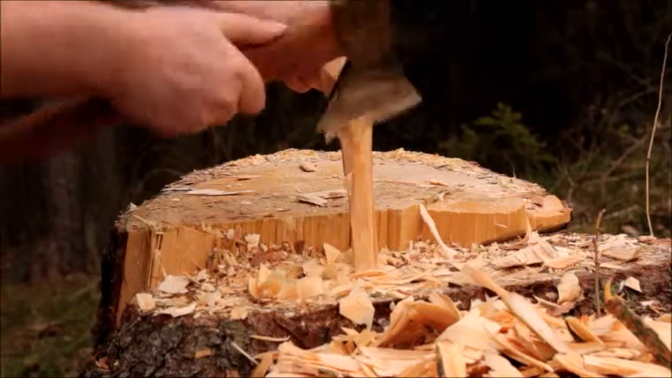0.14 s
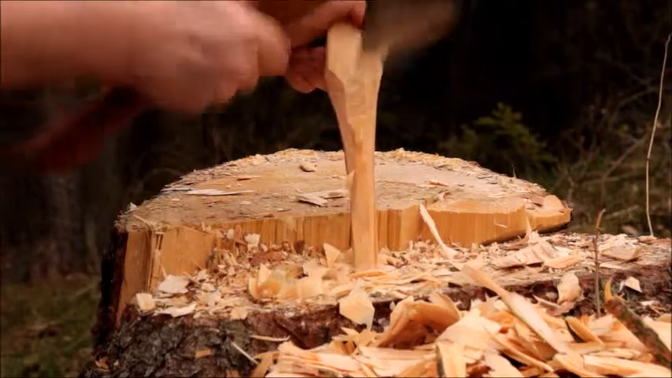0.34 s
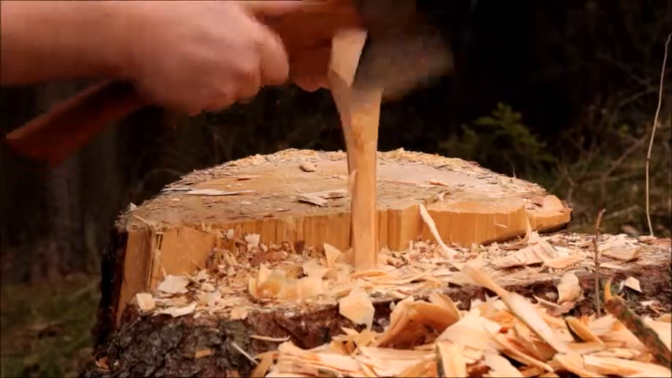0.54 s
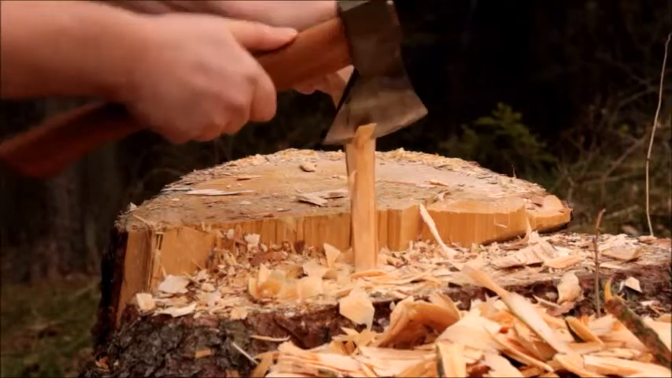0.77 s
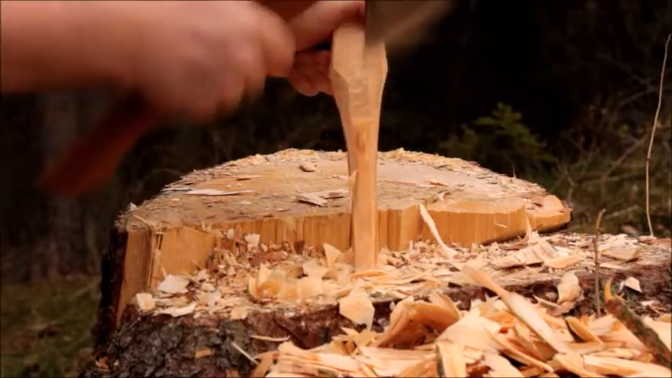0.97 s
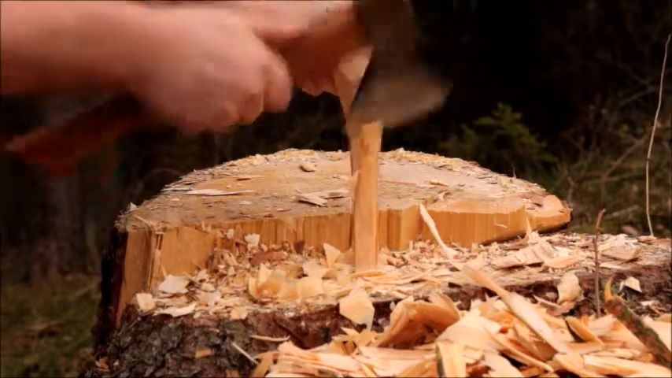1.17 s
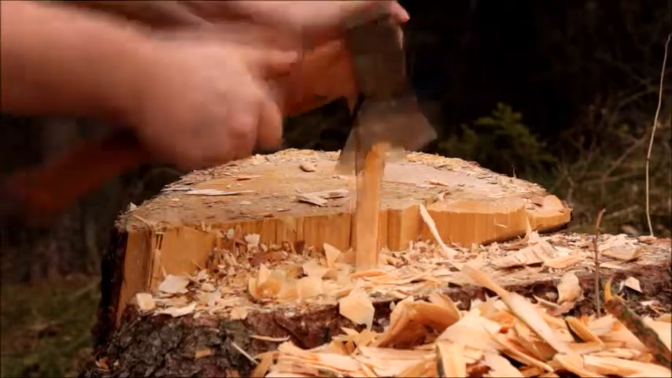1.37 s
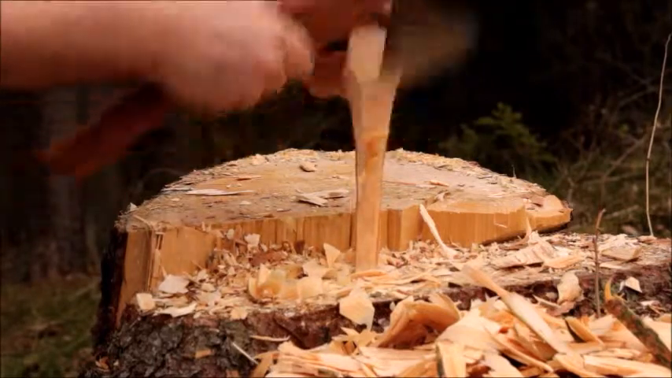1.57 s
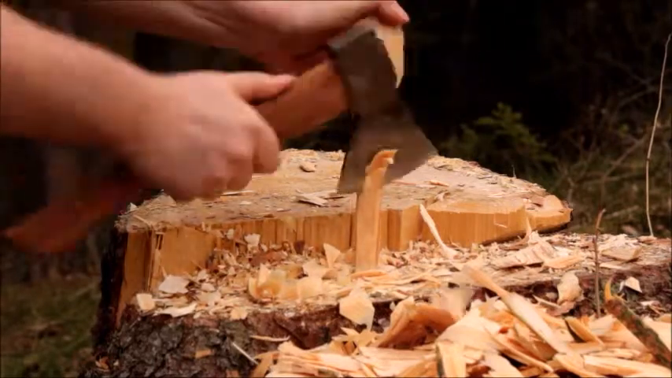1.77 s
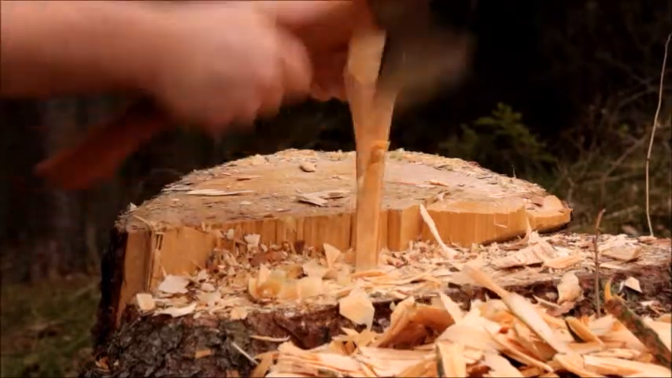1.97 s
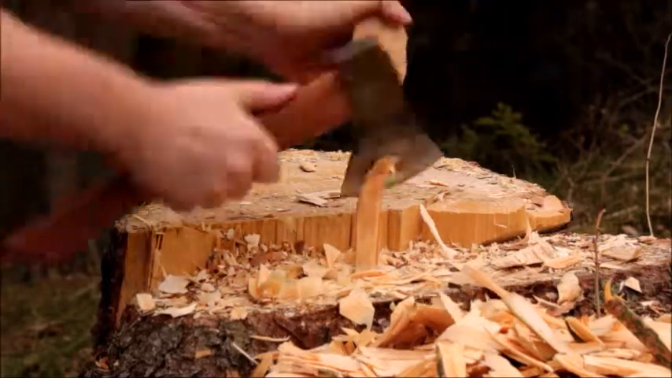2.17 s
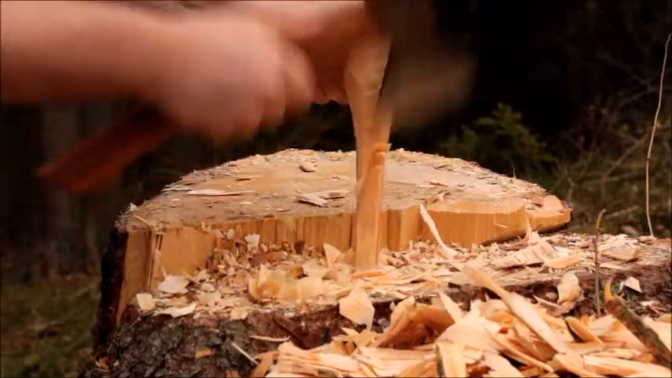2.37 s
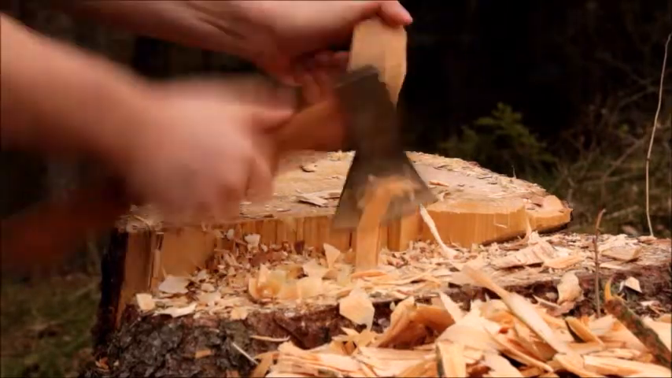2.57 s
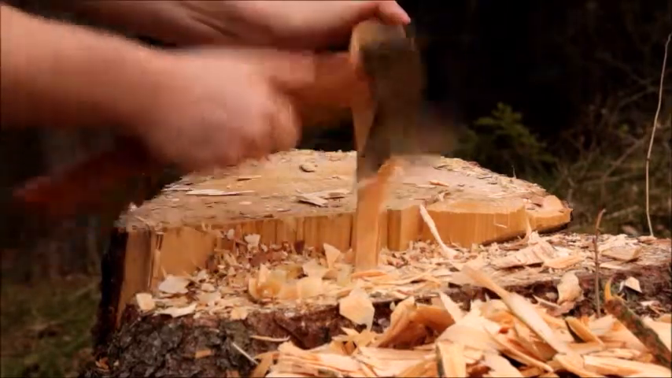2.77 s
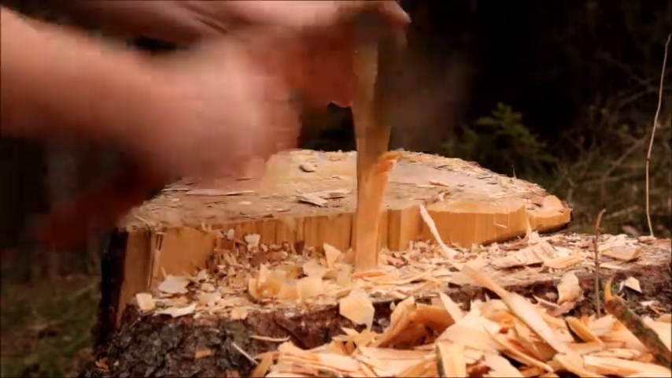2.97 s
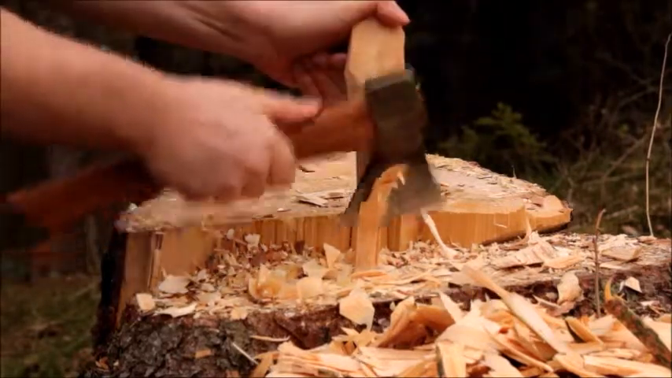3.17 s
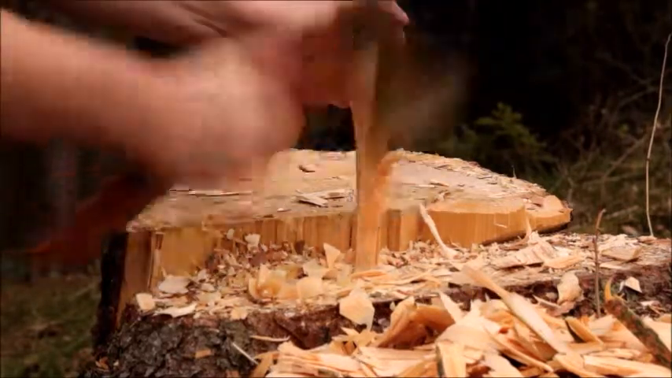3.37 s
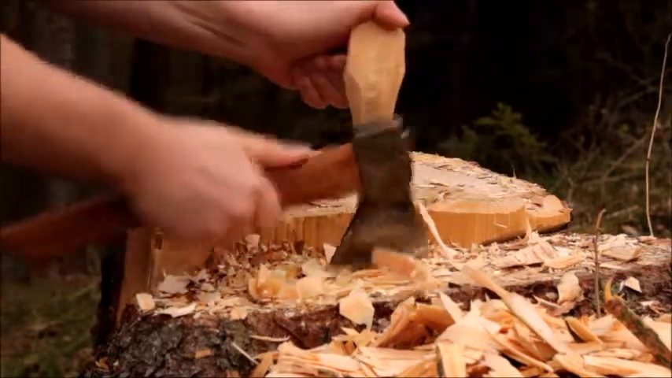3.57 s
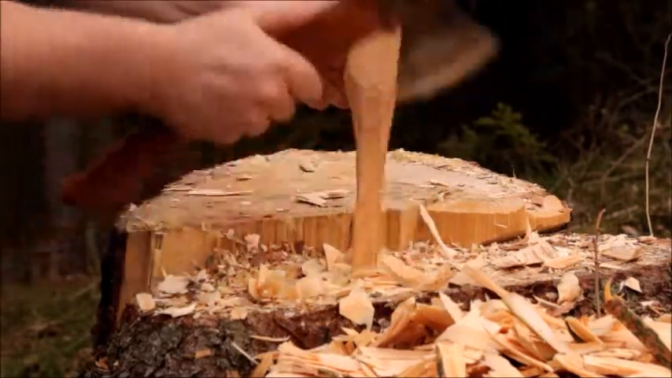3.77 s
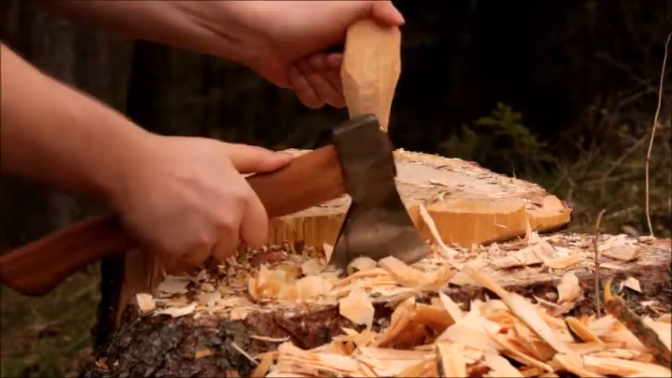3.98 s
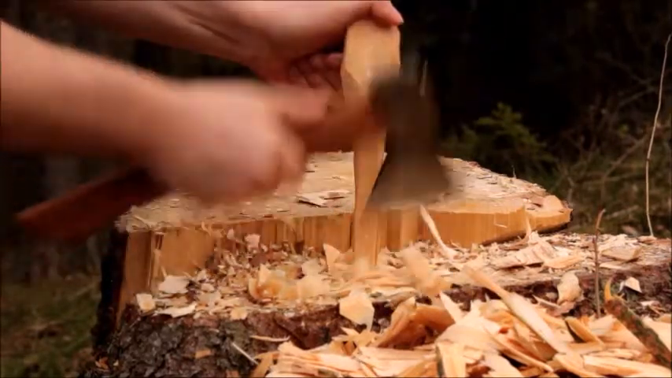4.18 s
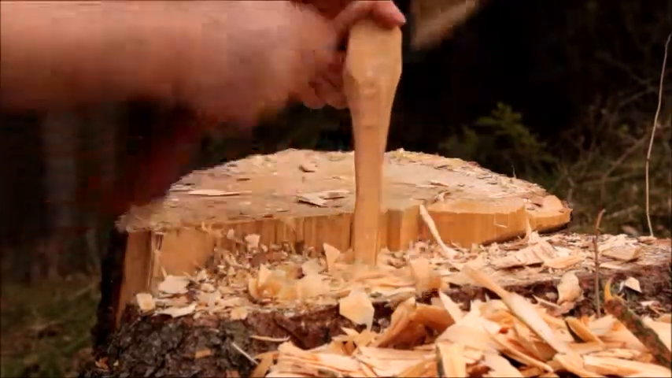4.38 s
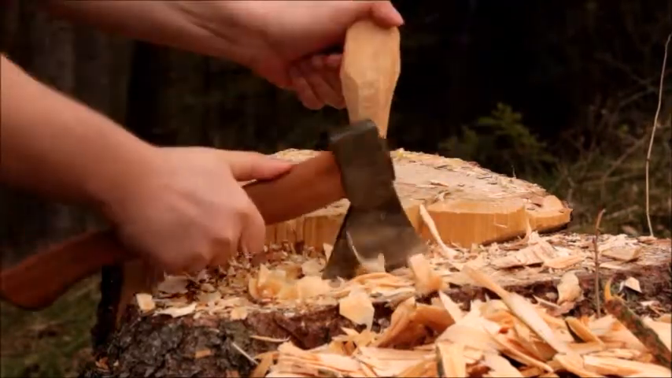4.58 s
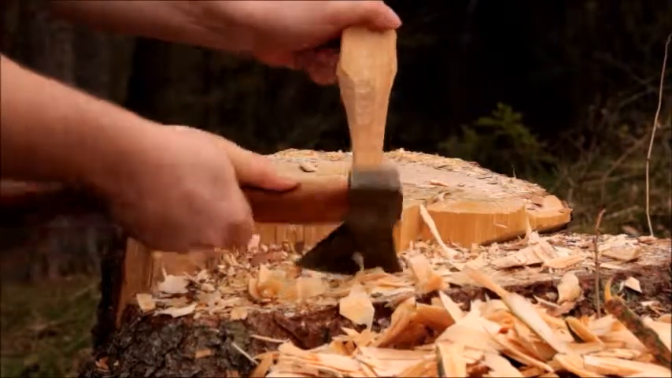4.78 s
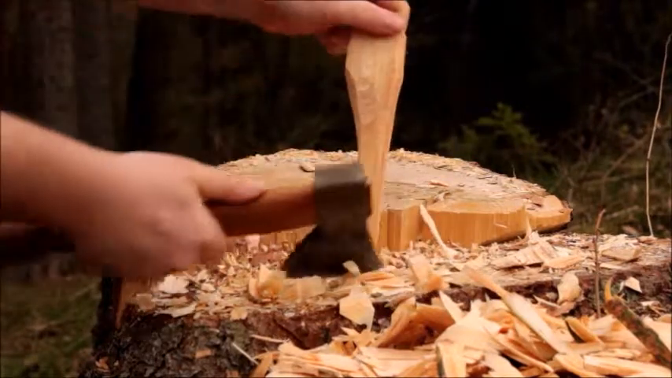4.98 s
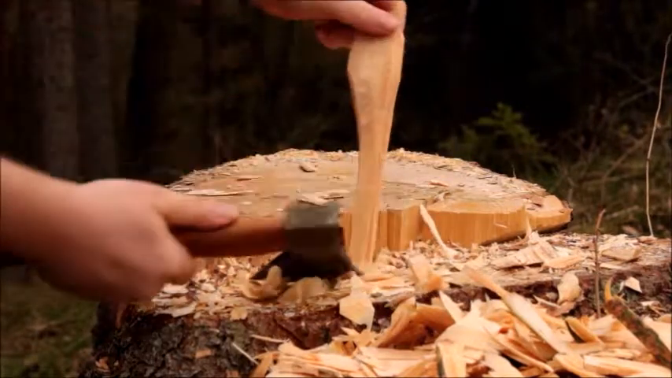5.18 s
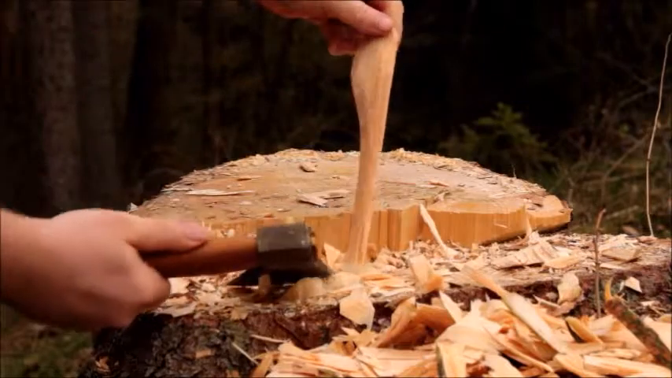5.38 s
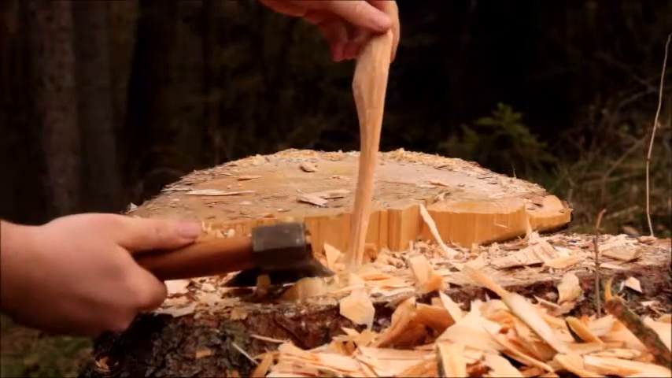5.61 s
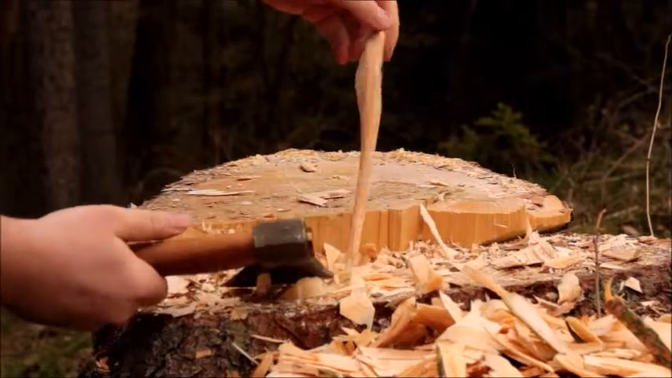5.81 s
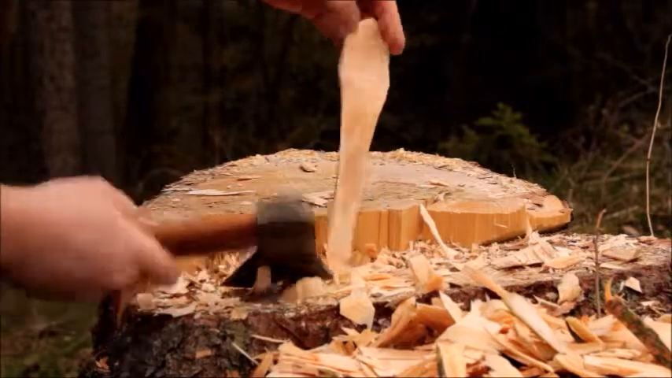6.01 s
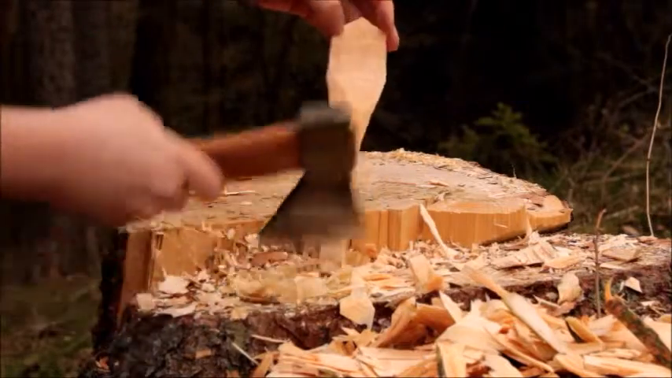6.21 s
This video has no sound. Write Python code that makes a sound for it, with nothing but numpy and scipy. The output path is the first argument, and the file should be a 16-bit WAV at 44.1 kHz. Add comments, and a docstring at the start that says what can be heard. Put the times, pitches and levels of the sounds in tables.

```python
"""A hatchet trims a wooden blank held upright on a stump in a forest, close to the microphone. Each chop sets
damped modes of blank, axe head and stump ringing; noise bursts crack, slice and snap the fibres. Among the
trees a small bird sings a two-note song of gliding tones, with fainter slurs; a second bird adds quick falls.
Far off are wavering bird whistles, a faint very high whistle, a blur of birds and a soft rush of air, all
coloured noise or slightly unsteady tones; trunks return a long wash of the axe and the song."""
import sys
import numpy as np
from scipy import signal
from scipy.fft import rfft, irfft, next_fast_len
from scipy.io import wavfile
from scipy.ndimage import uniform_filter1d, minimum_filter1d, map_coordinates

SR = 44100
rng = np.random.default_rng(int(sys.argv[2]) if len(sys.argv) > 2 else 0)


def digitize_waveform(pressure):
    """Quantize a signal to 16-bit integers and store it at the path in sys.argv[1].

    Rows of a 2-D input are taken as channels; values are limited to [-1, 1].
    """
    field = np.atleast_2d(pressure).T
    bounded = np.clip(field, -1, 1)
    quanta = np.round(bounded * 32767).astype(np.int16)
    wavfile.write(sys.argv[1], SR, quanta)


N = 275625
NOW = np.arange(N) / SR  # the whole scene, s
T = np.arange(SR // 4) / SR  # one short sound, s
BLOW_S = 0.008  # reference length for the energy of a blow
TOP_HZ = 16500  # upper band limit

# Distant air and birds.
# colour of air in the trees: f/Hz, relative level/dB per Hz
RUSH = [(12, -43), (20, 1.5), (86, 0), (168, -6), (204, -8), (347, -2.5), (499, -1), (949, -7), (1030, -7),
        (1120, -8), (1710, -13), (3530, -16), (5080, -20), (14300, -24), (16000, -23)]
# swells of the far birds: t/s, half width/s, level over their usual/dB
SWELLS = [(0, 0.22, 9.5), (2.03, 0.52, 9), (5.13, 0.36, 8)]
AIR_DB, CHORUS_DB = -53.5, -65.5  # air; far birds between their swells, relative to unit noise
DIP_S, DIP_DB, DIP_RECOVER_S = 2.65, -1.5, 0.14  # the background dips briefly and recovers
# single whistles from birds deep in the wood: t/s, length/s, f/Hz, level before each swells and fades/dB
FAR_NOTES = [(0.528, 0.84, 7220, -63.5), (1.279, 0.31, 3630, -58), (1.44, 0.22, 3090, -56),
             (4.06, 0.035, 4400, -59), (4.189, 0.028, 5580, -56.5), (4.699, 0.43, 2824, -65)]
# lower tone of a faint, very high whistle: t/s, f/Hz
WHISTLE = [(4.92, 12063), (5.04, 12500), (5.08, 13139), (5.164, 12100), (5.348, 12581), (5.356, 11833),
           (5.5, 10900)]
WHISTLE_DB, WHISTLE_SAG_DB_PER_S = -60, 10  # starting level of each tone and its decline
WHISTLE_FADE_S, WHISTLE_RATIO = 0.017, 1.21  # fade in and out; upper tone over lower

# The small bird among the trees.
# note shapes, before each note's pitch ratio: length/s, start f/Hz, wait/s, swoop time/s, settled f/Hz,
# drift/(Hz/s), closing flick/Hz, attack/s, sag/(dB/s), release/s
RISE = dict(length_s=.195, start_hz=6560, wait_s=0, swoop_s=.011, settled_hz=4597, drift_hz_per_s=3500, flick_hz=706, attack_s=0.044, sag_db_per_s=33, release_s=.02)
FALL = dict(length_s=0.1806, start_hz=7720, wait_s=0.043, swoop_s=.045, settled_hz=4536, drift_hz_per_s=-10000, flick_hz=-150, attack_s=0.071, sag_db_per_s=79, release_s=0.013)
SLUR = dict(length_s=0.16, start_hz=5150, wait_s=0, swoop_s=0.016, settled_hz=4100, drift_hz_per_s=-1500, flick_hz=-250, attack_s=0.01, sag_db_per_s=47.5, release_s=0.057)
QUICK_FALL = dict(FALL, length_s=0.11, wait_s=0, swoop_s=0.022, drift_hz_per_s=-12000, attack_s=0.028)
# when each note is sung: t/s, level before flutter/dB, pitch ratio
RISES = [(0.097, -45, 1.012), (.613, -44.5, 0.99), (1.117, -44, 0.99), (1.601, -60, 0.9),
         (4.314, -46, 1.02), (4.818, -41.5, 1.008), (5.332, -43, .99)]
FALLS = [(.348, -42, 0.98), (0.851, -38, 0.99), (1.369, -41.5, 0.96), (4.55, -39, 0.99), (5.07, -40, 0.98),
         (5.571, -41, 0.99)]
SLURS = [(1.855, -60, 0.78), (2.582, -60, 0.93), (2.965, -57.5, 1)]
QUICK_FALLS = [(4.081, -51, 1), (6.024, -58, 1)]
NOTE_RANGE_DB, FLICK_S = 19.5, 0.013  # how far below full level a note opens and closes; time of the flick
LEAD_IN_HZ_PER_S = 22000  # a waiting note climbs toward its start pitch

# The hatchet, close by.
# strokes: t/s, bending level/dB, blank's bending f/Hz, knock level/dB, crack level/dB,
# blade's travel through the wood/s, slicing level before fibre colour/dB, landing level/dB
STROKES = [(0.1035, -23.5, 1768, -24, -34.5, 0.023, -33, -24),
           (0.4361, -25.5, 1723, -24.5, -41.5, 0.013, -37, -28.5),
           (0.7428, -11, 1767, -23, -23.5, 0.017, -30, -27.5),
           (1.084, -16.5, 1737, -23, -30, 0.01, -36, -25.5),
           (1.4244, -27.5, 1970, -25, -40.5, .016, -42, -27),
           (1.796, -19.5, 1870, -22.5, -32, 0.013, -29.5, -34),
           (2.2178, -17.5, 2045, -21, -17, 0.013, -37, -56),
           (2.6287, -20.5, 2037, -21, -27.5, 0.0086, -31, -29.5),
           (3.0644, -17, 2126, -30.5, -20, 0.014, -29.5, -56),
           (3.4732, -21.5, 2176, -26, -31, .0232, -25.5, -21.5),
           (3.9672, -21.5, 2165, -25.5, -25, .0218, -27.5, -11),
           (4.5185, -14, 2123, -22.5, -19.5, 0.012, -19.5, -15)]
# modes of the blank, before they follow its bending pitch: f/Hz, relative level/dB, t60/s
BLANK = [(234, -31, 0.011), (410, -27, 0.0065), (499, -8.5, 0.06), (616, 10.5, 0.018), (900, 10, 0.012),
         (1042, 20.5, 0.0073), (1176, 6, 0.0056), (1480, -7, 0.02)]
# modes of the axe head: f/Hz, relative level/dB, t60/s
HEAD = [(2350, -3, 0.013), (2850, 2, 0.0062), (2840, 5, 0.028), (3220, -11, 0.014), (3510, -10.5, 0.037)]
# modes of the bare steel: f/Hz, relative level/dB, t60/s
STEEL = [(4530, -1, 0.023), (5510, 3, 0.041), (6700, -18, 0.0435), (10060, -16, 0.092), (14900, -18, .04)]
# the bare steel rings on: t/s, level/dB
PINGS = [(0.106, -43.5), (0.742, -22.5), (1.797, -54)]
# colour of the crack: f/Hz, relative level/dB
CRACK = [(1500, -25), (3000, -2.5), (3700, -4.5), (5200, -5.5), (7000, -10), (10000, -20.5), (14000, -25.5),
         (16000, -22.5)]
# wash from stump and ground: f/Hz, t60/s
SCATTER = [(150, 0.14), (600, 0.049), (1800, 0.067), (5000, 0.025), (15000, 0.015)]
# wash from the trunks: f/Hz, t60/s
FOREST = [(200, 0.385), (1000, 1.27), (2000, 0.46), (4500, 0.84), (8000, 0.74), (15000, 0.26)]
# modes of the stump: f/Hz, relative level/dB, t60/s
STUMP = [(282, -13, 0.02), (633, -5.5, 0.0086), (828, -5, 0.012), (979, 6, 0.012), (1175, 4.5, .012),
         (1410, -8, 0.008), (2000, -4, 0.0093), (3230, 1, 0.014), (4020, 1.5, 0.009)]
# dull bumps as hatchet and blank are shifted: t/s, level/dB, f/Hz
BUMPS = [(3.693, -46, 74), (4.59, -44.5, 79), (4.68, -50, 44.75), (4.79, -45, 50), (4.867, -46.5, 69),
         (5.98, -54, 59.3)]
# fibres snap as a chip breaks away: t/s, level before fibre colour/dB, centre f/Hz
SNAPS = [(0.1261, -32, 4570), (0.4478, -38, 4200), (0.452, -37, 6100), (1.0953, -32.5, 4830),
         (1.4416, -23, 6400), (1.4457, -31.5, 6500), (2.638, -17.5, 7700), (2.6473, -21.5, 13300),
         (3.4795, -22.5, 5450), (3.482, -26, 5300)]
# colour of breaking fibres: f/Hz, gain/dB
FIBRE = [(3000, -0.5), (4800, -4.5), (6500, 0), (8000, -3), (10200, -6), (13500, 2.5), (16000, 1.5)]
# a brief cluster of fading tones just after one stroke: f/Hz, relative level/dB, t60/s
CLUSTER = [(1260, -5, 0.12), (1590, -5, 0.098), (3350, 0.5, 0.083), (5630, -1.5, 0.081), (5930, -1, 0.091),
           (6400, -9, .1), (7070, -7, 0.085), (7540, -3, 0.095), (8250, -10, .09), (10050, -2, 0.081),
           (10650, 1, 0.073), (15000, -4, .08)]
USUAL_DB, THICK_HZ = -19, 1706  # an ordinary stroke; bending pitch before the blank is whittled down
# ring time of an ordinary stroke on a thick blank; exponent for thinness; dB of ring-time ratio per dB of stroke
BEND_T60_S, THIN_DAMPING, BITE_DAMPING = 0.023, 3.8, 0.42
# a lower, quickly damped bending mode, stronger in a thin blank
LOW_BEND_RATIO, LOW_BEND_DB, LOW_BEND_DB_PER_OCTAVE = 0.771, -5, 18.5
HEAD_DB, HEAD_DB_PER_OCTAVE = -10.5, 16  # axe head against the stroke: stands out more on a thin blank
THUD_DB, THUD_DB_PER_OCTAVE, THUD_HZ = -58, 60.5, 135  # the stump shakes more under a thin blank
SLICE_DELAY_S, SLICE_HZ = 0.002, 4220  # slicing starts just after the bite
LANDING_HZ = 1230  # brightness of the contact with the stump
REBOUND_S, REBOUND_DB = 0.045, -33.5  # a landing bounces once
JOLT_DB, JOLT_MAX_DB = -3.5, -31.5  # jolt against the landing, and at most
TEAR_DB, TEAR_T60_S = -6, 0.047  # tearing behind a snap, against the snap


def amp(db):
    """Linear gain for a level in dB."""
    return 10 ** (np.asarray(db) / 20)


def unit(x):
    """Scale x to rms 1."""
    return x / np.sqrt(np.mean(x ** 2) + 1e-20)


def blow(x):
    """Scale a short sound to the energy of rms 1 held for the length of a blow."""
    return x / np.sqrt(np.sum(x ** 2) / (BLOW_S * SR) + 1e-20)


def add(track, s, x):
    """Mix x into the track at time s."""
    i = max(round(s * SR), 0)
    track[i:i + len(x)] += x[:max(N - i, 0)]


def along(points, hz):
    """Read (Hz, value) points on a log frequency axis."""
    f, v = np.transpose(points)
    return np.interp(np.log(hz + 1), np.log(f + 1), v)


def wobble(rate, size):
    """A smooth random curve, rate knots a second."""
    knots = rng.standard_normal(int(size * rate / SR) + 4)
    return map_coordinates(knots, [np.arange(size) * rate / SR])


def filtered(x, gain):
    """Shape x by a gain that depends on frequency."""
    m = next_fast_len(len(x) + 8192)
    hz = np.fft.rfftfreq(m, 1 / SR)
    return irfft(rfft(x, m) * gain(hz), m)[:len(x)]


def noise(spectrum, size):
    """Coloured noise of rms 1."""
    white = rng.standard_normal(size)
    return unit(filtered(white, lambda hz: amp(along(spectrum, hz))))


def resonate(x, hz, q):
    """One resonance, with q raised to at least 3 hz / SR."""
    hz = min(hz, 0.4 * SR)
    return signal.lfilter(*signal.iirpeak(hz, max(q, 3 * hz / SR), SR), x)


def ring(modes, attack):
    """Damped modes that start together, with new strengths and slightly new pitches every time."""
    x = np.zeros(len(T))
    for hz, db, t60 in modes:
        strength_db, detune = rng.standard_normal(2) * [1.5, 0.008]
        decay = amp(db + strength_db - 60 * T / t60)
        x += decay * np.sin(2 * np.pi * hz * (1 + detune) * T)
    # a small body radiates little below its lowest mode
    radiation = signal.butter(2, 0.78 * modes[0][0], "high", fs=SR)
    return signal.lfilter(*radiation, x * (1 - np.exp(-T / attack)))


def tail(decay, size):
    """Diffuse echoes of energy 1; each frequency dies at its own speed."""
    hz, t, z = signal.stft(rng.standard_normal(size), SR, nperseg=256)
    fade = amp(-60 * t / along(decay, hz)[:, None])
    x = signal.istft(z * fade, SR, nperseg=256)[1]
    x = x * (1 - np.exp(-np.arange(len(x)) / SR / 0.00023))
    return x / np.linalg.norm(x)


def scattered(x, wet):
    """Stump, chips and ground throw a short wash back at a linear gain wet."""
    return x + wet * signal.fftconvolve(x, tail(SCATTER, size=len(T)))[:len(x)]


def thinness(bend_hz):
    """Octaves by which whittling has raised the blank's pitch."""
    return np.log2(bend_hz / THICK_HZ)


def bend_t60(db, bend_hz):
    """Ring time of the blank: shorter when it is thin and under a deep bite."""
    return BEND_T60_S * (THICK_HZ / bend_hz) ** THIN_DAMPING * amp(-BITE_DAMPING * (db - USUAL_DB))


def breaks():
    """A dense, uneven run of tiny fibre breaks, as noise of fluctuating level."""
    return rng.standard_normal(len(T)) * np.exp(0.65 * wobble(1500, size=len(T)))


def bump(db, hz):
    """A dull, low shake of the whole stump: two damped modes with a soft onset."""
    return amp(db) * blow(ring([(hz, 0, 0.06), (hz * 1.235, -3, 0.05)], attack=0.0035))


def forest_air():
    """Air in the trees and a swelling blur of far birds, as coloured noise; the level dips briefly."""
    dip_db = DIP_DB * (NOW > DIP_S) * np.exp(-np.abs(NOW - DIP_S) / DIP_RECOVER_S)
    chorus_db = CHORUS_DB + sum(db * np.exp(-((NOW - s) / width) ** 2) for s, width, db in SWELLS)
    air = amp(AIR_DB + 0.34 * wobble(8.1, size=N)) * noise(RUSH, size=N)
    # f/Hz, relative level/dB
    colour = [(2000, -28.0), (3000, 1), (3600, 1.5), (5000, -3.0), (7000, -6.0), (9000, -46.0)]
    chorus = amp(chorus_db + wobble(11.0, size=N)) * noise(colour, size=N)
    return amp(dip_db) * (air + chorus)


def glide(length_s, start_hz, wait_s, swoop_s, settled_hz, drift_hz_per_s, flick_hz,
          attack_s, sag_db_per_s, release_s):
    """Pitch (Hz) waits, swoops, drifts and flicks; loudness (gain) swells, sags and is released."""
    moving = np.maximum(T - wait_s, 0)
    left = np.maximum(length_s - T, 0)
    hz = settled_hz + (start_hz - settled_hz) * np.exp(-moving / swoop_s)
    hz = hz + drift_hz_per_s * moving + flick_hz * np.exp(-left / FLICK_S)
    hz = hz - LEAD_IN_HZ_PER_S * np.maximum(wait_s - T, 0)
    opening = np.sin(np.pi / 2 * np.minimum(moving / attack_s, 1)) * np.minimum(left / release_s, 1)
    db = NOTE_RANGE_DB * (opening - 1) - sag_db_per_s * np.maximum(moving - attack_s, 0)
    soft_ends = np.minimum(np.minimum(T, left) / 0.004, 1)
    return hz, amp(db) * soft_ends


def bird(shape, notes):
    """One pure gliding note, repeated; near trunks echo it and make its loudness flutter."""
    out = np.zeros(N)
    hz, loudness = glide(**shape)
    hz = uniform_filter1d(hz, size=400)  # the throat rounds the corners of the glide
    for s, db, ratio in notes:
        pitch = hz * ratio * (1 + 0.0025 * wobble(169.4, size=len(T)))
        flutter = np.exp(0.33 * wobble(110, size=len(T)))
        tone = np.sqrt(2) * np.sin(2 * np.pi * np.cumsum(pitch) / SR)
        note = amp(db) * loudness * flutter * tone
        add(out, s, note)
        for delay in rng.uniform(0.002, 0.02, size=3):
            add(out, s + delay, 0.12 * note)
    return out


def among_trees(x, wet_db):
    """The trunks return a long, late wash that dies at its own speed in each band."""
    wash = tail(FOREST, size=SR)
    wash = wash * (1 - np.exp(-np.arange(len(wash)) / SR / 0.0049))
    return amp(wet_db) * signal.fftconvolve(x, wash)[:N]


def chops(modes_at_hz=1795):
    """The edge bites: the blank knocks and rings in bending, higher as it is whittled down; bare steel pings."""
    out = np.zeros(N)
    for s, db, bend_hz, knock_db, crack_db, *_ in STROKES:
        thin = thinness(bend_hz)
        rise = bend_hz / modes_at_hz
        blank = [(hz * rise, level, t60) for hz, level, t60 in BLANK]
        knock = amp(knock_db) * blow(ring(blank, attack=0.00042))
        low_bend = (bend_hz * LOW_BEND_RATIO, LOW_BEND_DB + LOW_BEND_DB_PER_OCTAVE * thin, 0.006)
        main_bend = (bend_hz, 0, bend_t60(db, bend_hz))
        bend = amp(db) * blow(ring([low_bend, main_bend], attack=0.0003))
        head = amp(db + HEAD_DB + HEAD_DB_PER_OCTAVE * thin) * blow(ring(HEAD, attack=0.00016))
        burst = amp(-60 * T / 0.012) * (1 - np.exp(-T / 0.00088))
        crack = amp(crack_db) * blow(noise(CRACK, size=len(T)) * burst)
        add(out, s, scattered(knock - bend + head + crack, wet=0.17))
    for s, db in PINGS:
        add(out, s, amp(db) * blow(ring(STEEL, attack=0.0002)))
    return out


def knocks():
    """The stump thuds under each stroke, knocks hollow where the blade's travel ends, and bumps dully later."""
    out = np.zeros(N)
    contact = signal.butter(1, LANDING_HZ, fs=SR)
    for s, _, bend_hz, _, _, travel, _, landing_db in STROKES:
        add(out, s, bump(THUD_DB + THUD_DB_PER_OCTAVE * thinness(bend_hz), THUD_HZ))
        for delay, db in [(travel, landing_db), (travel + REBOUND_S, landing_db + REBOUND_DB)]:
            wood = signal.lfilter(*contact, ring(STUMP, attack=0.00059))
            add(out, s + delay, scattered(amp(db) * blow(wood), wet=0.12))
    for s, db, hz in BUMPS:
        add(out, s, bump(db, hz))
    return out


def cuts():
    """Fibres part in a dense run of tiny breaks that fades as the blade slows and keeps the blank shaking."""
    out = np.zeros(N)
    for s, *_, travel, db, _ in STROKES:
        run = breaks()
        rasp = unit(resonate(resonate(run, SLICE_HZ, q=0.95), SLICE_HZ, q=0.21))
        shake = unit(signal.fftconvolve(run, ring(BLANK, attack=0.0002))[:len(T)])
        past_end = np.maximum(T + SLICE_DELAY_S - travel, 0)
        stroke = (1 - np.exp(-T / 0.0011)) * np.exp(-0.5 * T / travel - past_end / 0.0058)
        add(out, s + SLICE_DELAY_S, scattered(amp(db) * (rasp + 0.5 * shake) * stroke, wet=0.187))
    return out


def snaps():
    """Each breaking splinter gives one sharp, bright tick, and the chip tears on behind it."""
    out = np.zeros(N)
    for s, db, hz in SNAPS:
        tick = resonate(rng.standard_normal(len(T)) * amp(-60 * T / 0.0095), hz, q=0.81)
        tear = resonate(breaks() * amp(-60 * T / TEAR_T60_S), hz, q=0.53)
        splinter = blow(tick) + amp(TEAR_DB) * blow(tear)
        add(out, s, scattered(amp(db) * splinter, wet=0.066))
    return out


def jolts(rings_longer=1.07):
    """The stopping blade jolts the blank and sets its bending mode ringing again."""
    out = np.zeros(N)
    for s, db, bend_hz, _, _, travel, _, landing_db in STROKES:
        again = ring([(bend_hz, 0, rings_longer * bend_t60(db, bend_hz))], attack=0.0008)
        jolt_db = min(landing_db + JOLT_DB, JOLT_MAX_DB)
        add(out, s + travel, amp(jolt_db) * blow(again))
    return out


def far_birds(blur_hz=35):
    """Distance blurs each whistle into a narrow, wavering band."""
    out = np.zeros(N)
    for s, length, hz, db in FAR_NOTES:
        t = np.arange(int(length * SR)) / SR
        # random phase and random loudness
        blur = np.exp(1j * wobble(2 * blur_hz, size=len(t)) + 0.5 * wobble(blur_hz, size=len(t)))
        tone = unit((blur * np.exp(2j * np.pi * hz * t)).real)
        add(out, s, amp(db) * tone * np.sqrt(np.sin(np.pi * t / length)))
    return out


def cluster(start=1.811, db=-30):
    """A brief cluster of fading tones, about 1.3 to 15 kHz, just after one stroke."""
    out = np.zeros(N)
    add(out, start, amp(db) * blow(ring(CLUSTER, attack=0.0014)))
    return out


def whistle():
    """Two thin, very high tones share one pitch path, each wavering on its own, and slowly fade."""
    s, pitch = np.transpose(WHISTLE)
    low_hz = np.interp(NOW, s, pitch)
    since, left = NOW - s[0], s[-1] - NOW
    fade = np.clip(np.minimum(since, left) / WHISTLE_FADE_S, 0, 1)
    level = fade * amp(WHISTLE_DB - WHISTLE_SAG_DB_PER_S * since)
    tones = np.zeros(N)
    for hz in (low_hz, low_hz * WHISTLE_RATIO):
        wavering = hz * (1 + 0.0028 * wobble(200, size=N))
        flutter = np.exp(0.48 * wobble(40, size=N))
        tones += np.sin(2 * np.pi * np.cumsum(wavering) / SR) * flutter
    return level * tones


def scene():
    """The close axe, the song among the trees, their wash from the trunks, and the distance behind."""
    fibres = filtered(cuts() + snaps(), lambda hz: amp(along(FIBRE, hz)))
    axe = chops() + jolts() + fibres + cluster() + knocks()
    song = bird(RISE, RISES) + bird(FALL, FALLS) + bird(QUICK_FALL, QUICK_FALLS) + bird(SLUR, SLURS)
    # the blank's bending tone carries farthest among the trunks
    carried = resonate(axe, 1800, q=8.4)
    echoes = among_trees(axe, wet_db=-38) + among_trees(carried, wet_db=-27.5)
    echoes = echoes + among_trees(song, wet_db=-10.0)
    return (axe + song + echoes + far_birds() + whistle() + forest_air())[None]


def record(dry):
    """A fast limiter holds the hardest peaks at full scale; then nothing passes above the band limit."""
    needed = 1 / np.maximum(np.abs(dry[0]), 1)
    gain = uniform_filter1d(minimum_filter1d(needed, size=25), size=25)
    return filtered(dry[0] * gain, lambda hz: np.clip((TOP_HZ - hz) / 600, 0, 1) ** 2)[None]


dry = scene()
out = record(dry)
digitize_waveform(out)
```